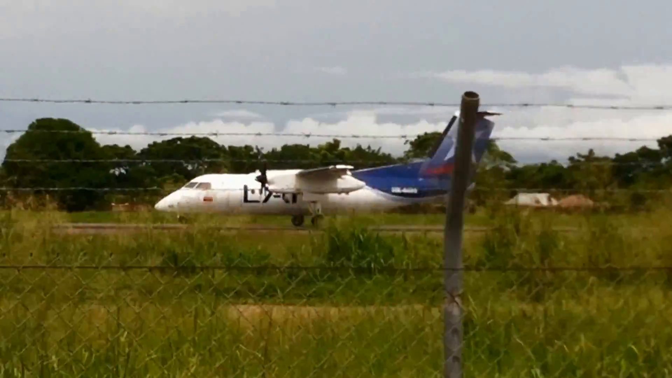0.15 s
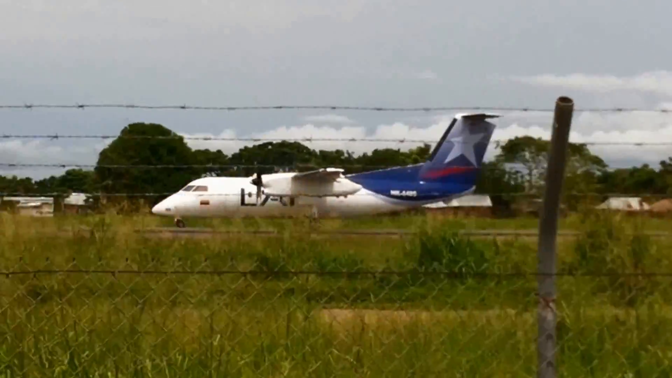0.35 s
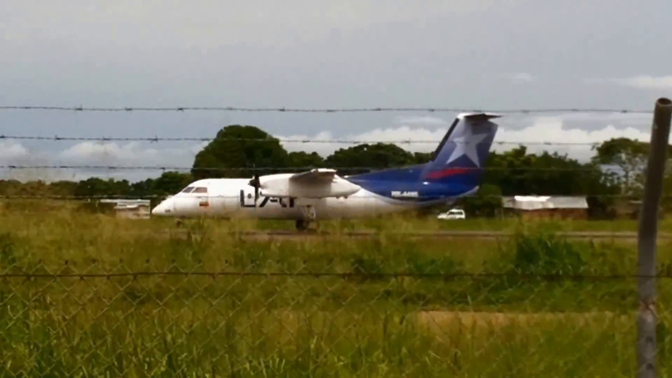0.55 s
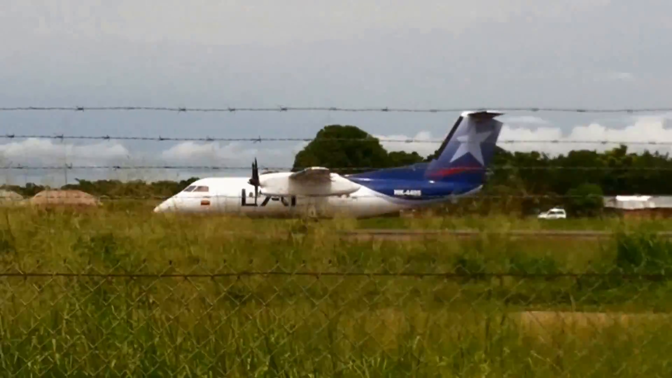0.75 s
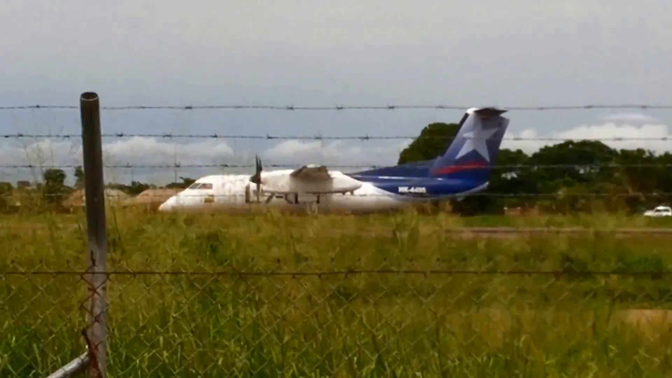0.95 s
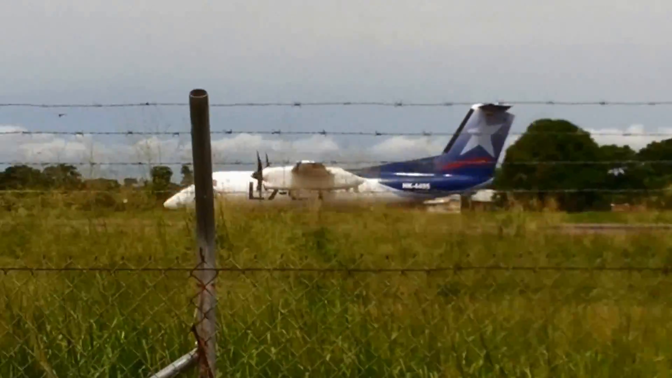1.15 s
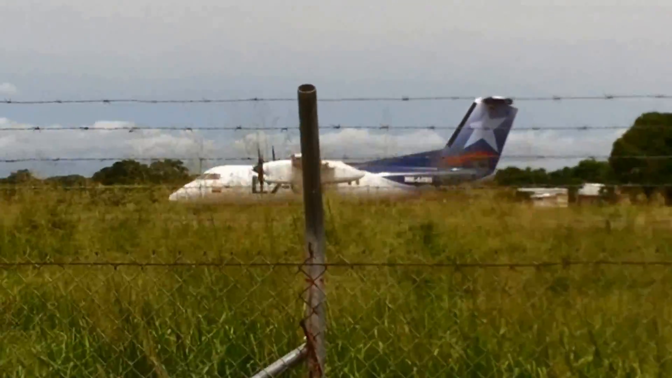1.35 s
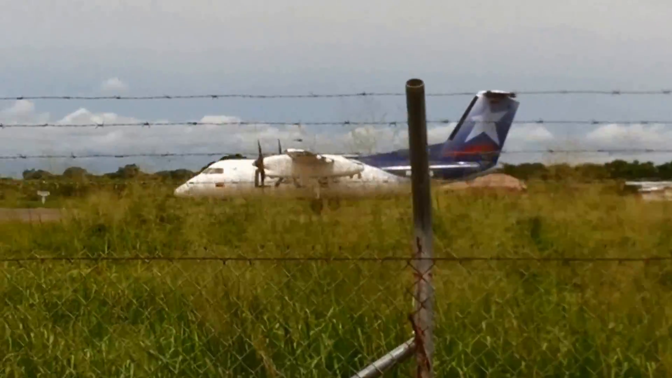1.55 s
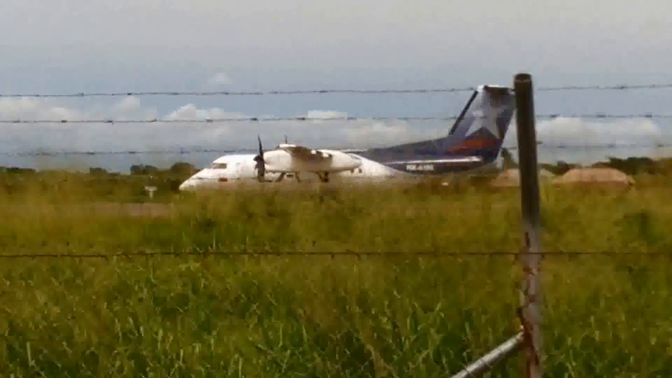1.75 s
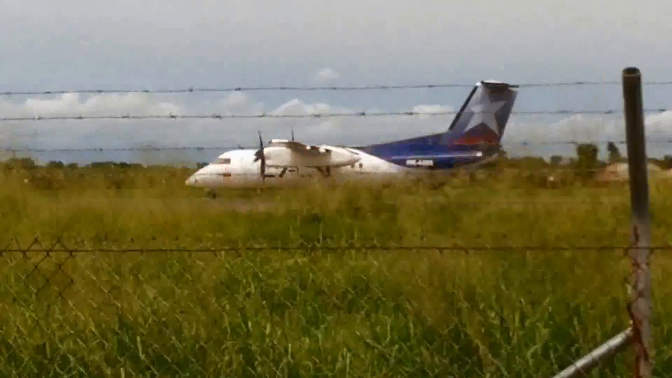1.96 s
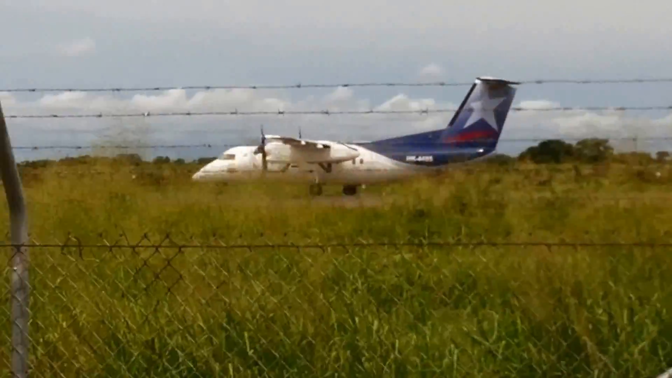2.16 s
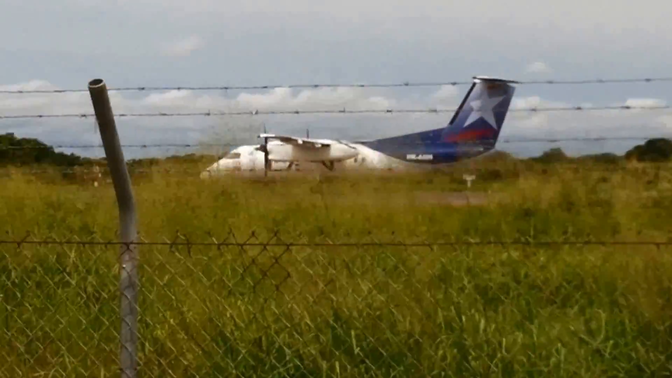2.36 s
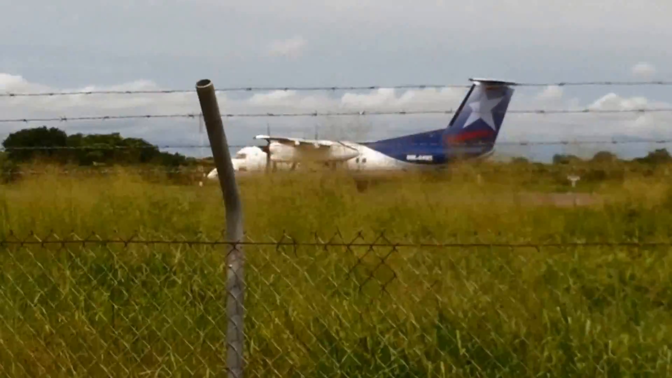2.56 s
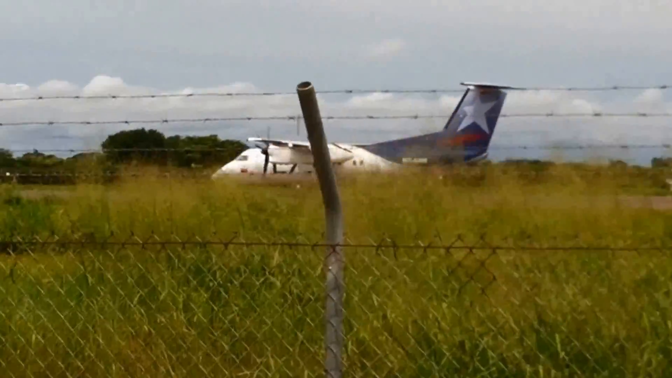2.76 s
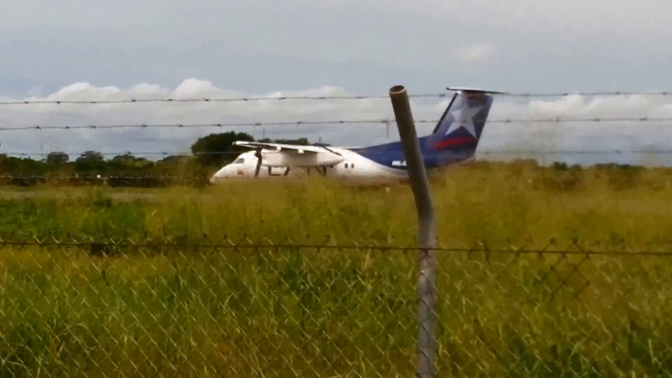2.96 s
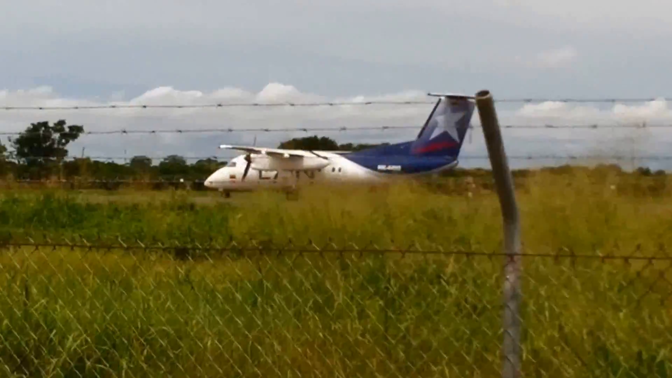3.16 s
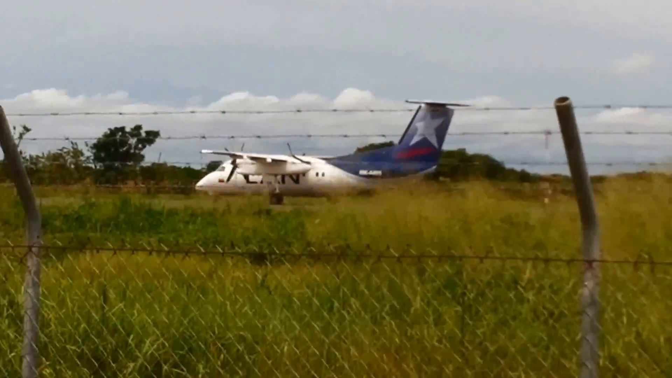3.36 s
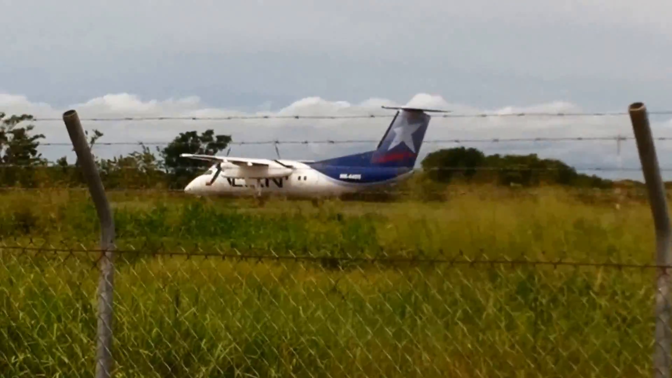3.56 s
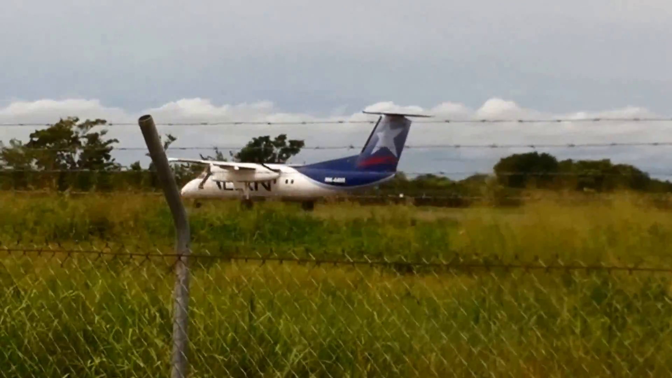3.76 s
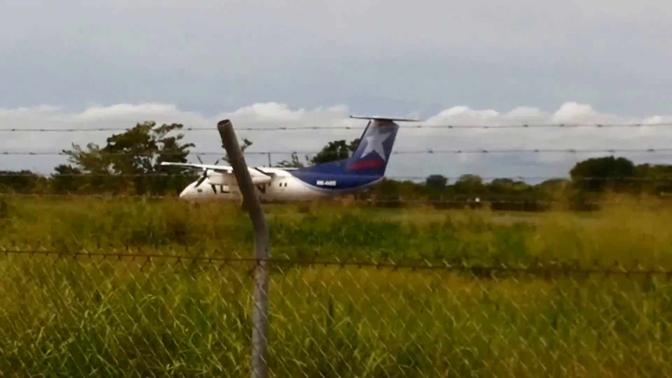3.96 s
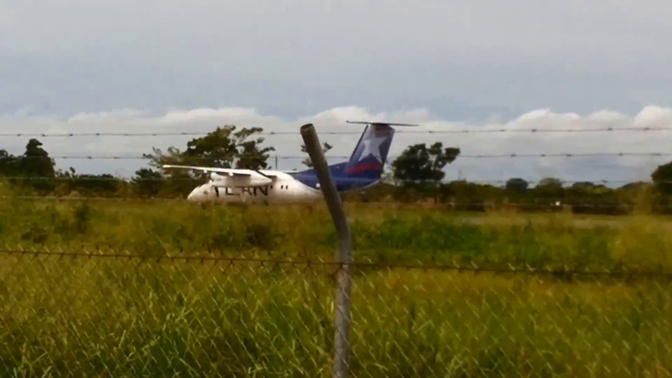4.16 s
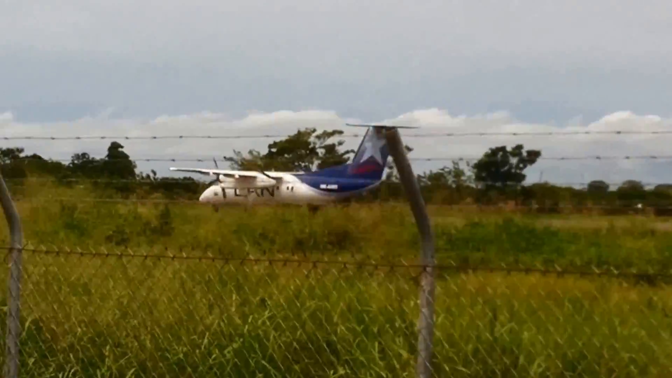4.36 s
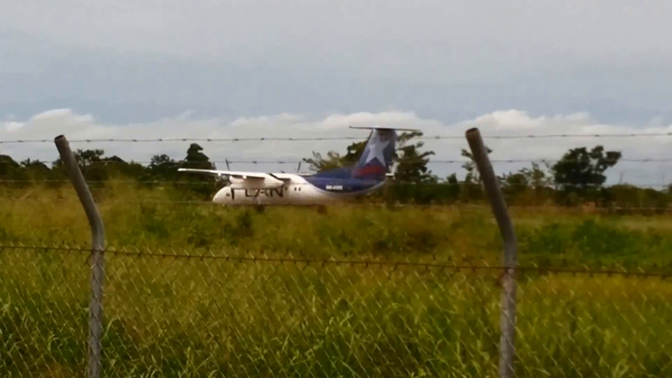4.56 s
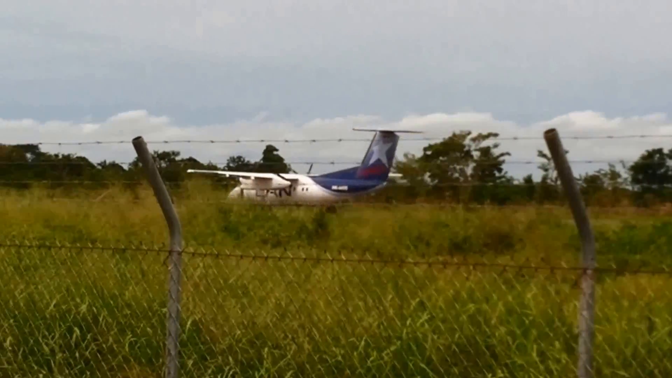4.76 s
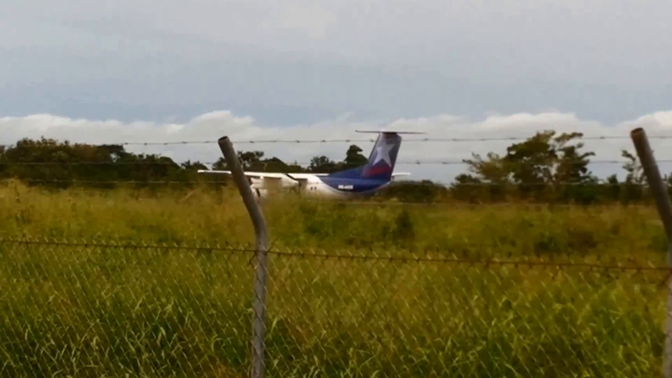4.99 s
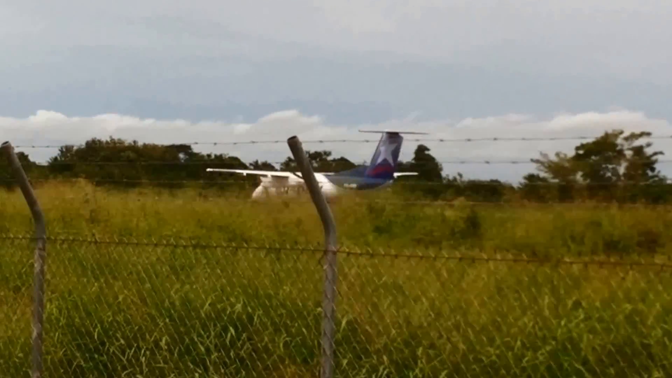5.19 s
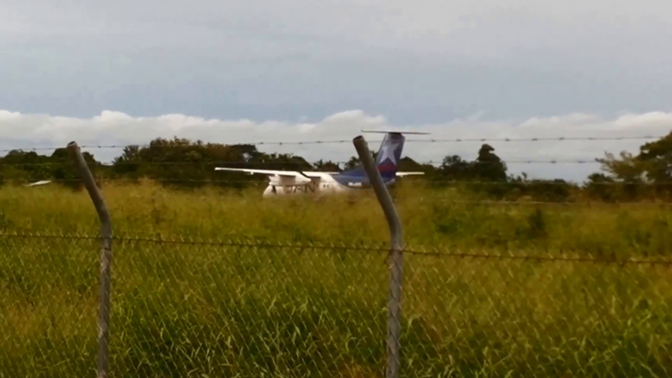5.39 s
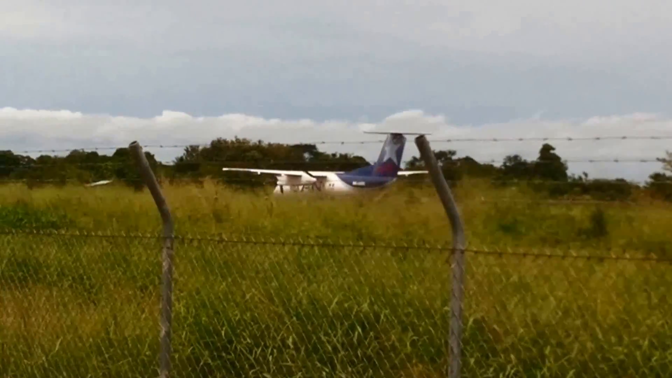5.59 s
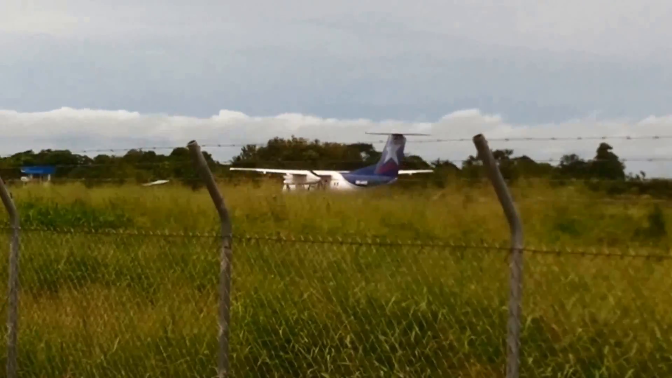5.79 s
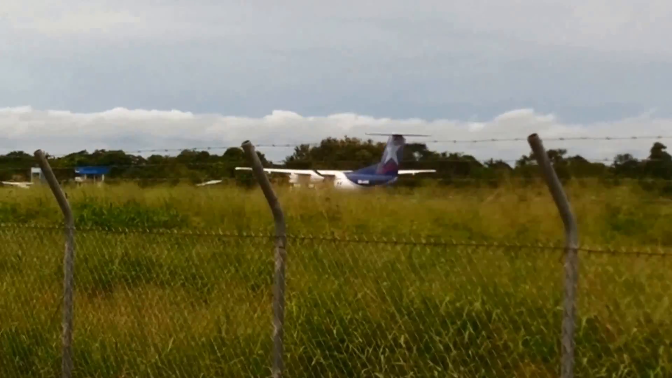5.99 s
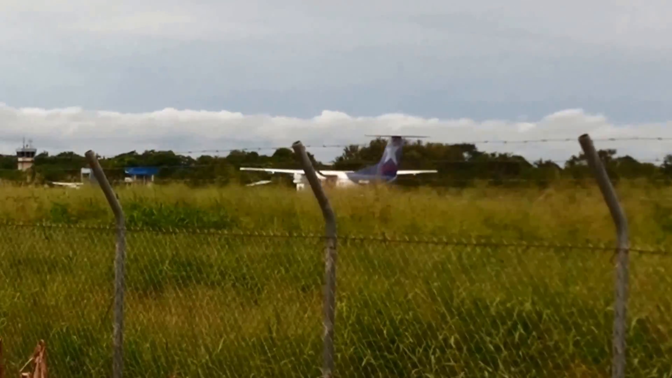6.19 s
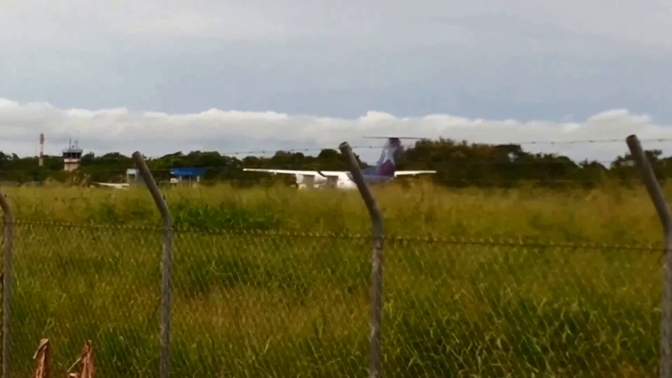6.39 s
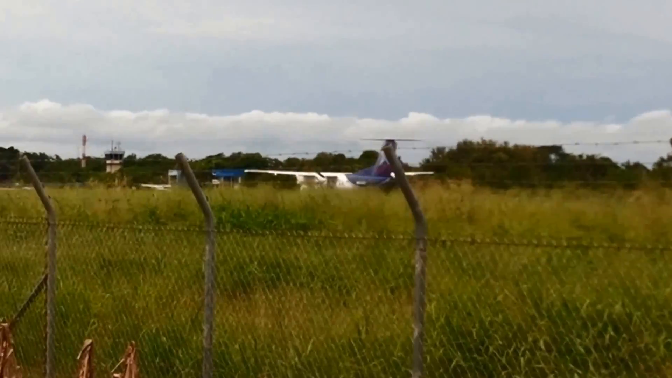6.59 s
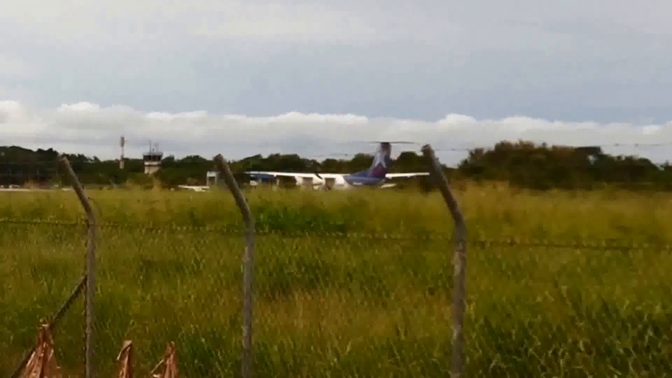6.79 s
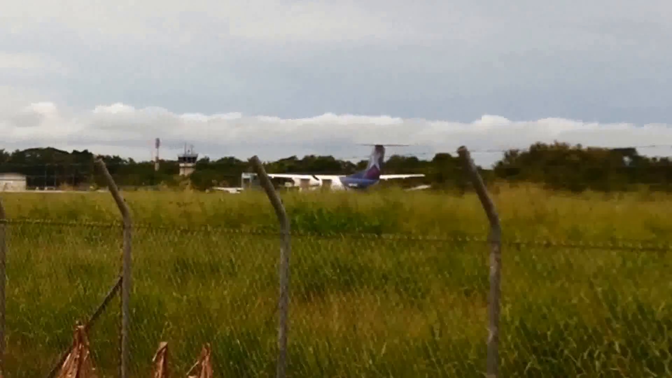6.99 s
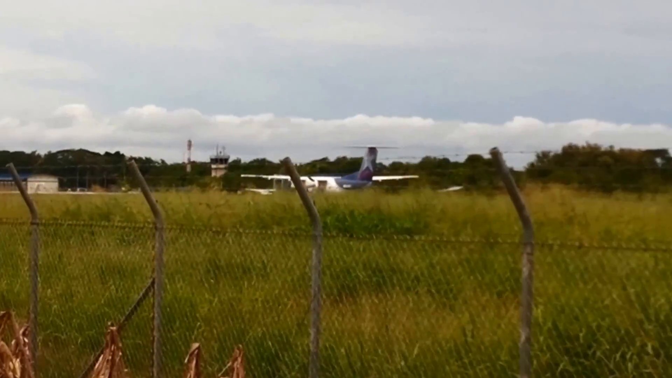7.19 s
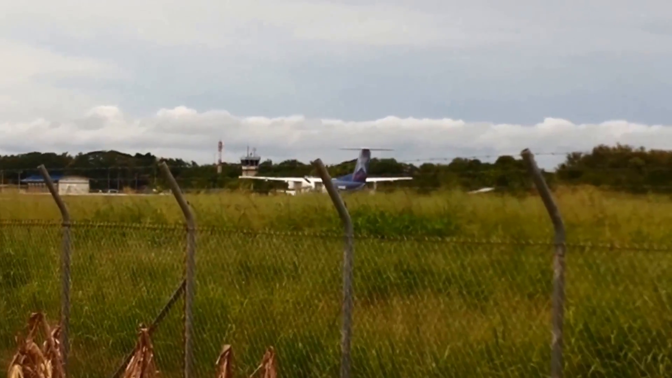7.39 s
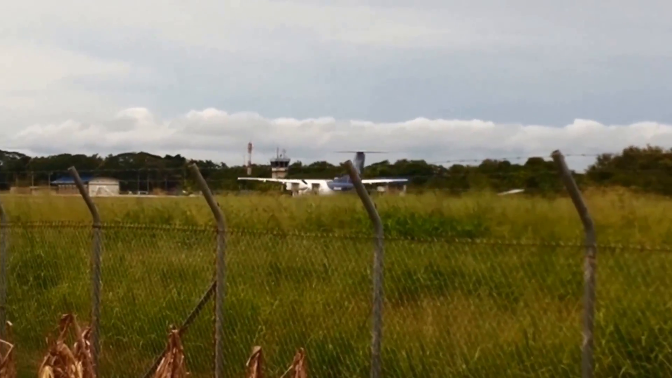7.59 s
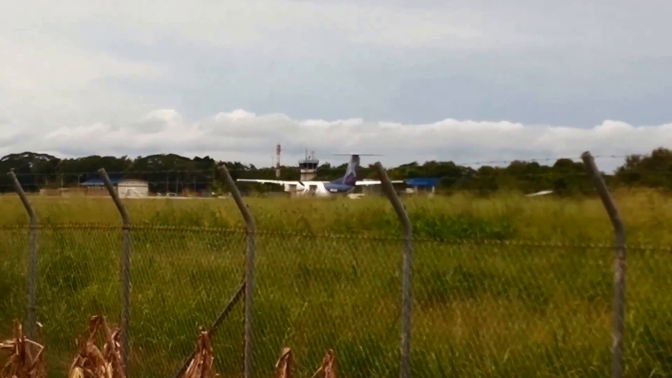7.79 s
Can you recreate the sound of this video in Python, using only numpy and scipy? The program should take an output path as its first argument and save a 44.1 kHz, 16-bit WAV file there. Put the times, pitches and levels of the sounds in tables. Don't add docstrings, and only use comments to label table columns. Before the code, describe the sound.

Loud propeller plane on its takeoff run, heard across grass: low buzzing drone, harsh fluttering hiss and shrill whine, dropping away after four seconds.

```python
import sys
import numpy as np
from scipy import signal
from scipy.fft import rfft, irfft, next_fast_len
from scipy.io import wavfile
from scipy.ndimage import uniform_filter1d, map_coordinates

SR = 44100
rng = np.random.default_rng(int(sys.argv[2]) if len(sys.argv) > 2 else 0)


def store_wav(level_fs):
    pcm = np.round(np.clip(np.atleast_2d(level_fs), -1, 1) * 32767)
    wavfile.write(sys.argv[1], SR, pcm.T.astype(np.int16))


def magnitude_from_level(level_db):
    exponent = np.asarray(level_db, float) / 20
    return 10 ** exponent


N = 345744

# time_s, rate_hz
BLADE_RATE = [(0.0, 82.41), (0.98, 80.84), (1.96, 79.17), (2.94, 77.62), (3.92, 76.21), (4.9, 74.89),
              (5.88, 73.65), (6.86, 72.65), (7.84, 72.29)]
# order, middle_s, half_length_s, peak_db
TONE_BEAMS = [(1, .06, .18, -27), (1, 1.01, .44, -20.4), (1, 1.79, .24, -22.2), (1, 2.44, .22, -25.5),
              (1, 2.97, .18, -26.9), (1, 3.51, .36, -20.6), (1, 4.33, .12, -37), (1, 4.65, .09, -33),
              (1, 5.0, .35, -34), (1, 5.85, .35, -30), (1, 7.0, .7, -31.5), (2, -.11, .24, -21),
              (2, .72, .27, -21.4), (2, 1.91, .34, -18.2), (2, 2.36, .26, -16.2), (2, 2.94, .18, -17.2),
              (2, 3.59, .53, -22.9), (2, 3.97, .11, -28.9), (2, 5.71, .08, -40), (2, 7.2, .65, -38),
              (3, .3, .75, -28.6), (3, .89, .13, -33.4), (3, 1.76, .09, -32), (3, 2.21, .13, -28.5),
              (3, 3.05, .22, -26.5), (3, 3.71, .11, -41), (4, .13, .13, -34.4), (4, .51, .16, -41),
              (4, 1.26, .28, -36), (4, 1.69, .14, -33.4)]
# order, middle_s, half_length_s, peak_db
UNEVEN_BLADES = [
    (1.5, .72, .2, -35),
    (1.5, 1.9, .4, -41),
    (2.5, 1.25, .35, -38),
    (2.5, 3.3, .5, -39),
    (5, 1.94, .37, -40),
]
# time_s, mid_roar_db, brightness_db
GRASS_PATH = [(0, -24, 3), (.4, -22.5, 1.5), (.85, -25.5, 0), (1.3, -24.5, 1), (1.7, -21.5, -0.9),
              (2.05, -23, 0.4), (2.4, -23.5, -1.7), (2.65, -25.5, 1.5), (3.0, -23.1, 0.3), (3.7, -24.6, -2),
              (4.05, -26.5, -.7), (4.25, -30.5, -3), (4.37, -22.5, 0.2), (4.72, -32, -1.2),
              (5.6, -32.5, -0.1), (5.97, -31, 1.2), (6.75, -35.5, 0.9), (7.84, -39.5, 0.2)]
# middle_s, half_length_s, shrill_db, whine_db
EDDY_EVENTS = [(0.112, 0.013, -4, 9), (0.378, 0.16, 0, 4.5), (0.467, 0.0079, 7.5, 1.0),
               (0.539, 0.027, -9, 3.5), (0.716, 0.035, 3, 3.5), (1.112, 0.091, 4.5, 1.5),
               (1.42, 0.11, 1.5, 5), (1.681, 0.068, -4, 0), (1.923, 0.056, 4.5, 4.5), (2.19, 0.027, 4, 7),
               (2.313, 0.012, 2.5, 6), (2.526, 0.012, -2, -8), (2.583, 0.14, 7.0, 1.5),
               (2.648, 0.017, 6, 6), (2.719, 0.035, -2, 3.5), (2.829, 0.011, 5, -3), (3.032, 0.012, 3.5, 3),
               (3.208, 0.14, 5, 2), (3.228, 0.018, -4.5, 0), (3.416, 0.065, -2, 4), (3.72, 0.095, 1, 3.5),
               (4.059, 0.12, 5, 1.5), (4.28, 0.02, 2, 2.0), (4.407, 0.048, 3.5, -0.5),
               (4.859, 0.12, 2, 2.5), (5.216, 0.12, 3, 1), (5.966, 0.035, 2.5, 4.5), (6.602, 0.035, 3.5, 3),
               (7.234, 0.12, 1.5, 1.5), (7.747, 0.12, 0, 1.5)]
# centre_hz, width_hz, gain_db
BODY_MODES = [(312, 82, -9), (640, 250, -1), (1279, 300, -5.5), (1870, 383, 2.5), (2474, 223, 1),
              (2950, 380, 0.5), (3570, 210, -9), (4135, 230, -8), (4550, 290, -6.5), (5030, 260, -5.5),
              (5630, 250, -2.5)]
# freq_hz, density_db
RUMBLE_SPECTRUM = [(30, -36), (55, -19), (70, -2), (105, 0), (135, 2.5), (170, -16), (260, -9.5),
                   (400, -19.5)]
# freq_hz, density_db
GROWL_SPECTRUM = [(130, -7), (175, 0.5), (240, -4.5), (310, -4), (370, -26)]
# freq_hz, density_db
LOW_SPECTRUM = [(260, -49), (320, -3.5), (380, -1.5), (500, -3), (800, -2), (1400, -9.5), (2000, -46)]
# freq_hz, density_db
MID_SPECTRUM = [(700, -12.5), (1100, -8.5), (1800, -0.5), (3000, -0.5), (3800, -14), (4500, -34)]
# freq_hz, density_db
UPPER_SPECTRUM = [(2800, -32), (3500, 5.5), (4500, -1), (5700, -0.5), (6100, -5), (6600, -38)]
# time_s, centre_hz, chop_depth_db
SHRILL_BAND = [(0, 7700, 12), (.5, 7740, 7), (1, 8030, 6), (1.5, 8250, 10.5), (2, 8370, 7),
               (2.5, 8500, 5.5), (3, 8470, 6), (3.7, 8540, 4), (4.1, 8820, 2.5), (4.5, 8680, 10.5),
               (5, 8340, 4.5), (6, 8410, 5), (7.84, 8020, 3)]
# time_s, lag_turns
CHOP_SLIP = [(0, -.35), (.9, -.44), (1.7, -.28), (2.5, -.47), (3.3, -.63), (3.7, -.63), (4.1, -.28),
             (4.5, -.13), (5.3, .05), (6.1, .35), (7.84, .52)]
# middle_s, gain_db, half_length_s
FOCUSED_BURSTS = [
    (2.625, 5, .012),
    (2.830, 6, .004),
    (4.401, 2.5, .003),
    (5.937, 14, .0015),
]
# freq_hz, gain_db
MIC_PORT = [(5000, 10), (8300, -2), (8750, 0.5), (9100, -6), (9800, -14), (11000, -22)]
# freq_hz, density_db
HISS_SPECTRUM = [(5600, -63), (6000, -4), (6400, -1), (7200, 3.5), (8300, 6.5), (8900, -2), (9600, -12.5),
                 (10400, -23), (11500, -28), (13000, -25), (15800, -36)]
# freq_hz, density_db
EDGE_SPECTRUM = [(4500, -14), (4900, 3), (5300, -3.5), (5800, -0.5), (6200, 3), (6600, -30)]
# freq_hz, density_db
FLOOR_SPECTRUM = [(20, -12), (60, -11), (300, 2), (3000, -12), (10000, -29), (16000, -25)]


def unit(x):
    return x / np.sqrt(np.mean(np.abs(x) ** 2) + 1e-20)


def curves(rows):
    time_s, *columns = np.transpose(rows)
    return [np.interp(np.arange(N) / SR, time_s, column) for column in columns]


def wobble(rate_hz):
    knots = rng.standard_normal(int(N * rate_hz / SR) + 4)
    return map_coordinates(knots, [np.arange(N) * rate_hz / SR])


def bell(middle_s, half_s):
    return np.exp(-0.5 * ((np.arange(N) / SR - middle_s) / half_s) ** 2)


def filtered(x, response):
    m = next_fast_len(N + 8192)
    spectrum = rfft(x, m) * response(np.fft.rfftfreq(m, 1 / SR))
    return irfft(spectrum, m)[..., :N]


def camera_body(hz):
    return sum(magnitude_from_level(db) * 1j * hz * width / (centre * centre - hz * hz + 1j * hz * width)
               for centre, width, db in BODY_MODES)


def rush(spectrum, patchy_db, through=np.ones_like):
    z = signal.stft(rng.standard_normal(N), nperseg=512)[2]
    field = uniform_filter1d(rng.standard_normal(z.shape), size=7, axis=0)
    field = uniform_filter1d(field, size=8, axis=1)
    x = signal.istft(z * magnitude_from_level(patchy_db * unit(field)), nperseg=512)[1][:N]
    freq_hz, density_db = np.transpose(spectrum)

    def colour(hz):
        return through(hz) * magnitude_from_level(np.interp(np.log(hz + 1), np.log(freq_hz), density_db, -120, -120))

    return unit(filtered(x, colour))


def fuzzy_tone(hz, width_hz):
    a, b = filtered(rng.standard_normal((2, N)), lambda f: np.exp(-0.5 * (f / width_hz) ** 2))
    carrier = np.exp(2j * np.pi * np.cumsum(hz) / SR)
    return unit(np.real((a + 1j * b) * carrier))


def follow(db, growth, tilt, fade_db_per_s):
    level_db, bright_db = curves(GRASS_PATH)
    return db + growth * (level_db + 28) + tilt * bright_db - fade_db_per_s * np.arange(N) / SR


def eddies():
    return sum(np.outer(db, bell(middle_s, half_s)) for middle_s, half_s, *db in EDDY_EVENTS)


def propellers(turn):
    cancel_s = [1.2, 3.22]
    tones = 0
    for k in range(1, 5):
        size = 0
        for order, middle_s, half_s, db in TONE_BEAMS:
            if round(order) == k:
                sign = (-1) ** np.searchsorted(cancel_s, middle_s) if k == 2 else 1
                size = size + sign * magnitude_from_level(db) * bell(middle_s, half_s)
        flutter = magnitude_from_level(0.7 * wobble(9.8))
        tones = tones + size * flutter * np.cos(k * turn + 0.76 * (k - 1))
    uneven = sum(magnitude_from_level(db) * bell(middle_s, half_s) * np.cos(order * turn)
                 for order, middle_s, half_s, db in UNEVEN_BLADES)
    return np.sqrt(2) * (tones + uneven)


def slipstream_growl():
    growl_db = follow(-39.5, growth=1.15, tilt=-0.4, fade_db_per_s=0.3)
    beam_db = 6.5 * bell(middle_s=3.74, half_s=1.2)
    return magnitude_from_level(growl_db + beam_db) * rush(GROWL_SPECTRUM, 1.9)


def roar(turn, eddy_db):
    rumble_db = follow(-33, growth=-0.05, tilt=-2, fade_db_per_s=0.88)
    low_db = follow(-30, growth=0.9443, tilt=-1.07, fade_db_per_s=0.36)
    mid_db = follow(-28, growth=1.09, tilt=0.43, fade_db_per_s=0.02)
    upper_db = follow(-35.5, growth=1.06, tilt=1.44, fade_db_per_s=0.02) + 0.31 * eddy_db.sum(0)
    flutter = wobble(14)
    beat = np.cos(turn - 2.3)
    rumble = magnitude_from_level(rumble_db + 0.76 * wobble(5)) * rush(RUMBLE_SPECTRUM, 1.0)
    low = magnitude_from_level(low_db + 1.16 * wobble(4.93) + 0.23 * flutter) * rush(LOW_SPECTRUM, 1.0, camera_body)
    mid_db = mid_db + 0.35 * wobble(6) + 0.9 * flutter + 0.72 * beat
    mid = magnitude_from_level(mid_db) * rush(MID_SPECTRUM, 0.75, camera_body)
    upper = magnitude_from_level(upper_db + 0.56 * flutter + 1.3 * beat) * rush(UPPER_SPECTRUM, 1.0, camera_body)
    return rumble + low + mid + upper


def shrill_band(phase, flutter, eddy_db):
    level_db = follow(-26, growth=1.54, tilt=-0.06, fade_db_per_s=0.13)
    level_db = level_db + 1.62 * eddy_db[0] + 0.78 * wobble(18)
    centre_hz, depth_db = curves(SHRILL_BAND)
    chop_db = depth_db * (np.cos(phase) + 0.36 * np.cos(2 * phase))
    gate = magnitude_from_level(chop_db + 0.29 * flutter + 1.7 * wobble(70))
    sweep_hz = 260 * np.sin(phase) + 190 * wobble(35)
    focus_db = sum(db * bell(middle_s, half_s) for middle_s, db, half_s in FOCUSED_BURSTS)
    chopped = unit(gate * fuzzy_tone(centre_hz + sweep_hz, width_hz=290))
    shrill = magnitude_from_level(level_db - 1.5 + focus_db) * chopped
    return filtered(shrill, lambda hz: magnitude_from_level(np.interp(hz, *np.transpose(MIC_PORT))))


def turbine(rate_hz, turn, eddy_db):
    phase = turn - 2 * np.pi * curves(CHOP_SLIP)[0] + 0.16 * wobble(8.5)
    flutter = wobble(22)
    whine_db = follow(-22.5, growth=0.65, tilt=0.75, fade_db_per_s=2)
    whine_db = whine_db + 1.4 * eddy_db[1] + 1.8 * wobble(11)
    hiss_db = follow(-24.5, growth=1.11, tilt=0.4, fade_db_per_s=0.99) + 0.39 * eddy_db.sum(0)

    whine_hz = 84.1 * rate_hz
    whine = fuzzy_tone(whine_hz + 25 * wobble(15), width_hz=85)
    whine = magnitude_from_level(whine_db - 2.5 + 0.47 * wobble(30) + 0.2 * np.cos(phase)) * whine
    octave = magnitude_from_level((whine_db + hiss_db) / 2 - 31.5) * fuzzy_tone(2 * whine_hz, width_hz=450)
    hiss = magnitude_from_level(hiss_db + 4 + 0.5 * flutter + 1.76 * np.cos(phase)) * rush(HISS_SPECTRUM, 1.25)
    edge = magnitude_from_level(hiss_db - 14.5 + 0.24 * flutter) * rush(EDGE_SPECTRUM, 2.8, camera_body)
    return shrill_band(phase, flutter, eddy_db) + whine + octave + hiss + edge


def quiet_field():
    return magnitude_from_level(-46) * rush(FLOOR_SPECTRUM, 0.6)


def scene():
    rate_hz, = curves(BLADE_RATE)
    turn = 2 * np.pi * np.cumsum(rate_hz) / SR - np.pi / 2
    eddy_db = eddies()
    aircraft = propellers(turn) + slipstream_growl() + roar(turn, eddy_db) + turbine(rate_hz, turn, eddy_db)
    return (aircraft + quiet_field())[None]


def band_limit(x):
    return signal.sosfilt(signal.butter(12, 15750, fs=SR, output="sos"), x)


def record(dry):
    reaction_s, threshold_db, duck_share = 0.06, -10, 0.51

    def smooth(v):
        return uniform_filter1d(v, size=int(reaction_s * SR))

    power_db = 10 * np.log10(np.abs(smooth(dry ** 2)) + 1e-12)
    excess_db = np.maximum(power_db - threshold_db, 0)
    ducked = dry * magnitude_from_level(-duck_share * smooth(excess_db))
    clipped = ducked / (1 + np.abs(ducked / 0.93) ** 9) ** (1 / 9)
    mix = filtered(clipped, lambda hz: hz < 15750)
    return band_limit(mix)


dry = scene()
out = record(dry)
store_wav(out)
```